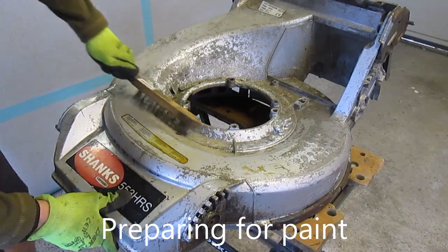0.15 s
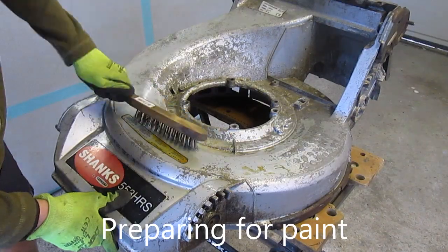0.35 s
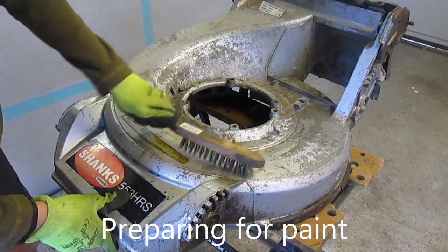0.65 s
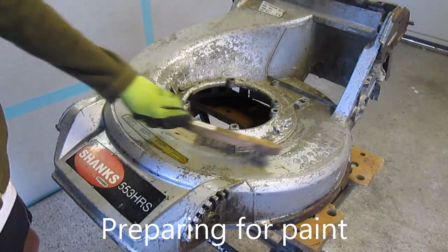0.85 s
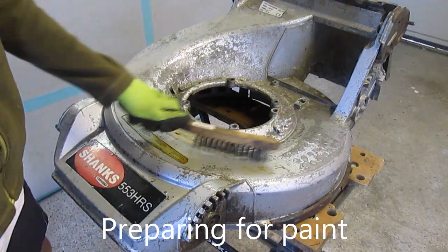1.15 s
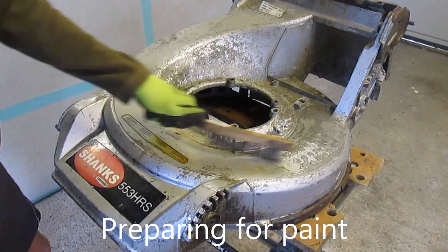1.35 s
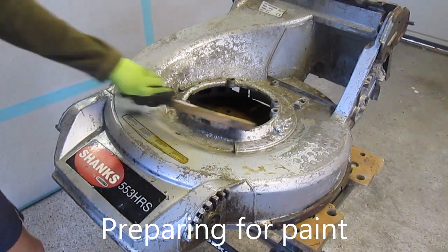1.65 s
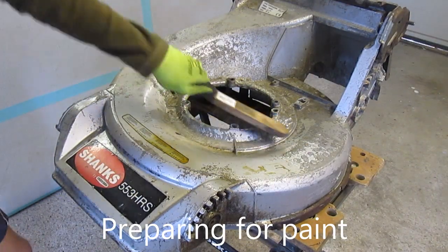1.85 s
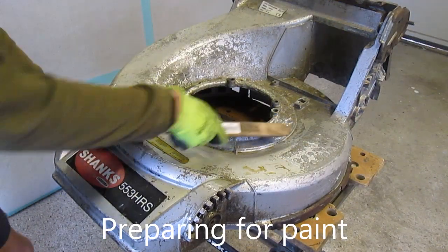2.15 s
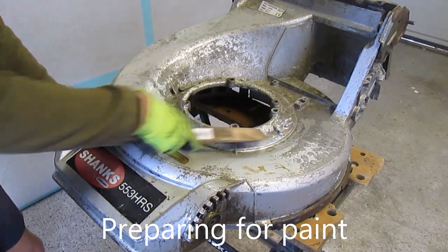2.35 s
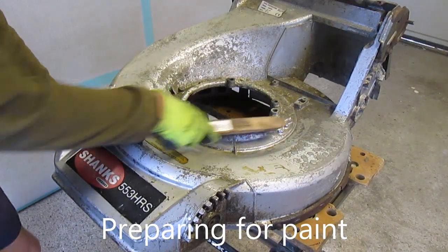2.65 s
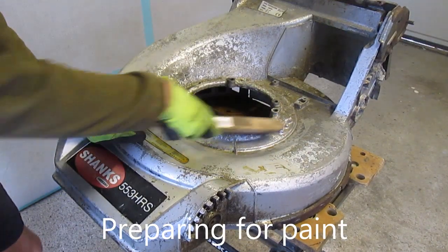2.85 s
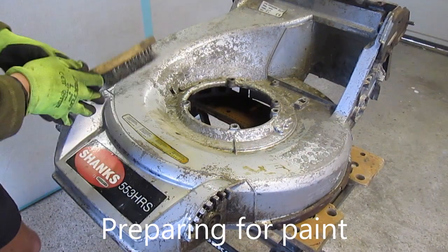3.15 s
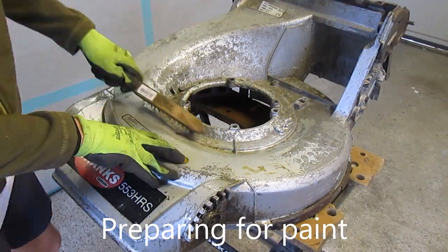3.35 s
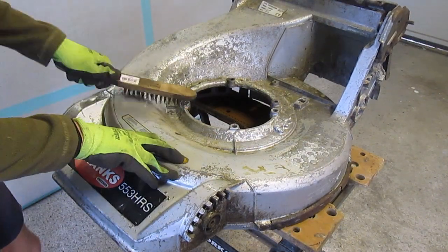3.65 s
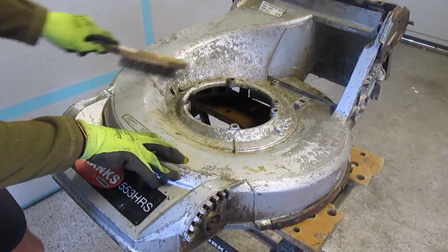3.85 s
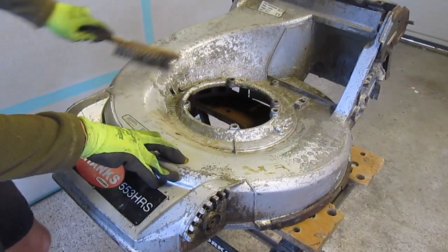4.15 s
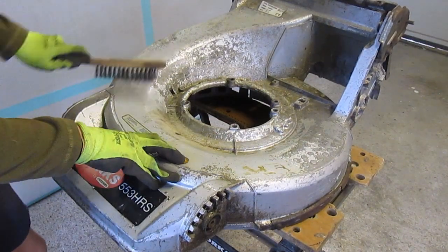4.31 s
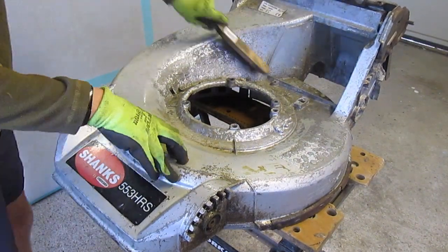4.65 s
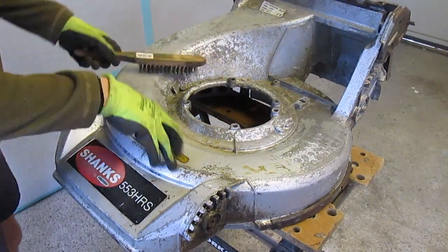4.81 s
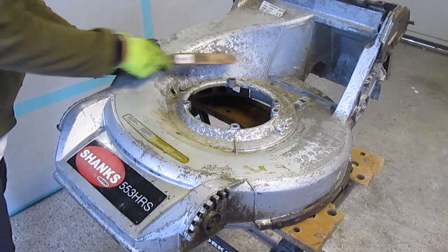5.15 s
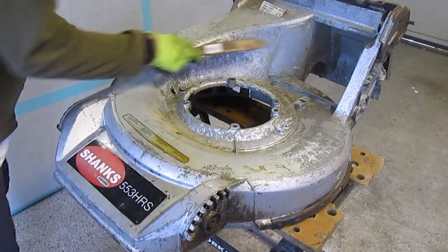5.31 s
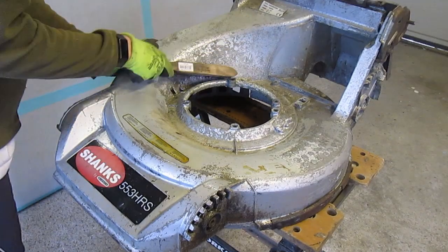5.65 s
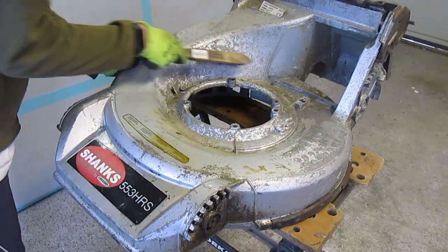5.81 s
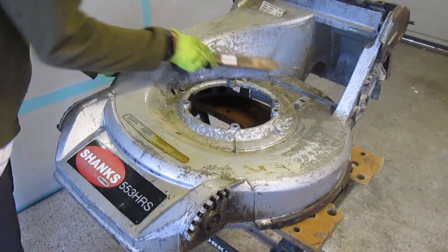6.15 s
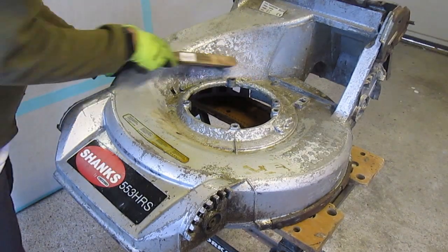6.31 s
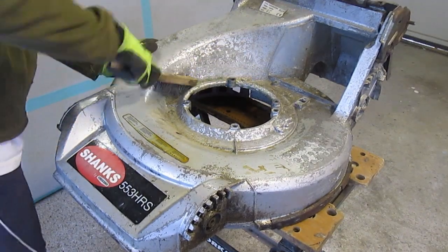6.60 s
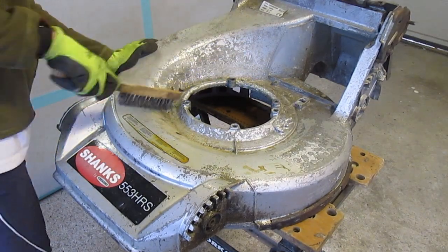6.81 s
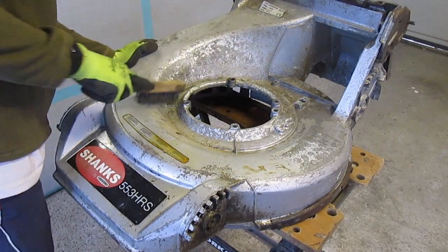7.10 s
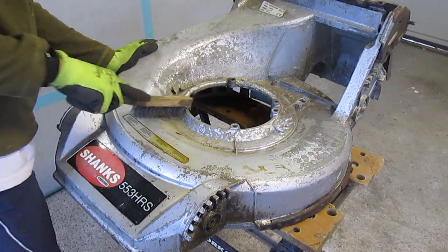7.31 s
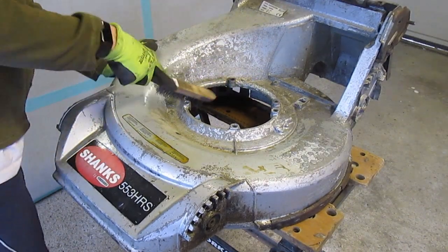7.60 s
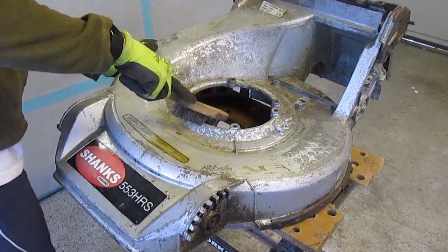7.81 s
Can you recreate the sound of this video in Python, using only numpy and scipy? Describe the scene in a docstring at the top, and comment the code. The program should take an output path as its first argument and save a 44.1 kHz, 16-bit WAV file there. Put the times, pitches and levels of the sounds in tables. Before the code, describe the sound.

Rapid gritty scratching of steel bristles on a metal housing, faintly ringing, broken by short pauses and occasional woody taps in a workshop.

```python
"""Wire brush on a metal shell

A wire brush scrubs a cast metal shell in a workshop, in quick short strokes with a few pauses.
Random ticks are the steel bristles on rough paint; they are heard bare and also ring the shell's modes.
The wooden back of the brush knocks now and then: a short hollow thump with a noisy rattle.
Coloured noise makes a low rumble, a faint hiss and a murmur that swells in the pauses.
Left and right share one sound, but the phase between them drifts in patches."""
import sys
import numpy as np
from scipy import signal
from scipy.fft import rfft, irfft, next_fast_len
from scipy.io import wavfile
from scipy.ndimage import uniform_filter1d

SR = 44100
rng = np.random.default_rng(int(sys.argv[2]) if len(sys.argv) > 2 else 0)


def transcribe(u):
    """Save the signal u as a 16-bit wav file named by the first command-line argument.

    u: samples, shape (n,) or (channels, n), limited to [-1, 1]; the rate is SR.
    q: integer samples, one column per channel.
    """
    v = np.clip(np.atleast_2d(u).T, -1, 1)
    q = np.round(v * 32767).astype(np.int16)
    wavfile.write(sys.argv[1], SR, q)


N = 351477  # length in samples, about 8 s

# All levels in the tables are relative: the layers are balanced against each other when mixed.
# The room's noise spectrum. Each row: frequency in Hz, strength in dB.
ROOM_SPECTRUM = [(15, 5.5), (25, 2), (42, -1.5), (70, -24.5), (150, -71), (400, -29), (1500, -27),
                 (3000, -40), (6000, -42), (9000, -54)]
# Knocks of the brush back. Each row: time in seconds, thump level in dB, pitch in Hz,
# hardness (rattle against thump) in dB.
KNOCKS = [(0.089, -41, 562, 8), (0.757, -43, 402, -11), (1.032, -36, 746, 8), (1.102, -30.5, 425, 5),
          (1.191, -44, 423, 21), (1.467, -47, 417, 19), (1.645, -40, 440, 6), (1.706, -56, 490, 12),
          (1.823, -47.5, 700, 19), (2.703, -38.5, 420, -19), (3.267, -33.5, 508, 5),
          (3.316, -35.5, 593, -15), (3.386, -44.5, 618, 16), (3.453, -36.5, 507, -24),
          (3.528, -43, 410, 15), (3.649, -36.5, 401, 11.5), (3.834, -47, 790, 23.5), (3.88, -32, 490, -17),
          (3.958, -39, 400, 16.5), (4.765, -30, 755, -8), (4.915, -55.5, 800, 32.5), (5.04, -39, 419, 0),
          (5.242, -40, 776, 15), (5.424, -40, 420, 3), (6.49, -37, 402, -27), (6.575, -35, 750, 13),
          (6.798, -35.5, 402, 12), (6.855, -37.5, 757, 2), (7.512, -26.5, 410, 6.5)]
# Ringing modes of the shell. Each row: frequency in Hz, width in Hz, level in dB.
SHELL_MODES = [(411, 30, -5), (520, 50, -13), (735, 60, -13), (1184, 45, -13), (1370, 35, -11),
               (1476, 18, -4), (1666, 28, -10), (1998, 45, -3.5), (2196, 38, -5), (2530, 60, -11),
               (2885, 50, -8), (2996, 14, -2), (3450, 36, 0), (3938, 45, -4), (4263, 55, -4), (4706, 55, 1),
               (4870, 45, -2), (5000, 50, .5), (5165, 70, -4), (5717, 60, -3), (5970, 70, -6),
               (6190, 80, -10), (6567, 90, -12), (7482, 90, -17)]
# How strongly three groups of shell modes ring at each spot. Each row: time in seconds,
# level near 1.5 kHz in dB, level near 2 kHz in dB, level near 3.2 kHz in dB.
SPOT_RINGING = [(0, -7.5, -12, -5.5), (.5, 6, 8, -4), (1, -12, 3.5, 4), (1.5, -10, -5, 1.5),
                (2, 1, 4.5, 0.5), (2.5, 9.5, 7, 5.5), (3, 11.5, 3, 3), (3.5, -7, 2, 3.5),
                (4, 2, -1.5, -7.5), (4.5, 4.5, 11, 3.5), (5, 1.5, 2, 0), (5.5, -4, -7, -1.5),
                (6, 6, 5, -0.5), (6.5, 3, 7, 4), (7, -1, 0, 0), (7.5, 0.5, 9, -1.5), (8, -3, -2.5, 11)]
# Bare scratch of the bristles. Each row: frequency in Hz, strength in dB.
SCRATCH_SPECTRUM = [(100, -34), (300, -24), (600, -19), (1000, -16), (1500, -16), (2300, -8), (3500, -3),
                    (5000, -1), (6200, -7), (8000, -18), (10000, -29), (12000, -43), (16000, -54)]
# The scrub as the brush moves from spot to spot. Each row: time in seconds, level in dB,
# low ring of the shell in dB, its hollow boom in dB, bristle tips in dB.
SCRUB = [(0, -24.5, 5.5, -6.5, 0), (.5, -25, -5.5, 1, -5), (1, -28.5, 2.5, -1.5, -5),
         (1.5, -26.5, 1, -4.5, -2), (2, -27.5, -3.5, 3, 6.5), (2.5, -27, -3.5, 6, 2), (3, -26, -5, 4, 5.5),
         (3.5, -27.5, 2.5, -2, 4.5), (4, -25.5, 1, 0.5, -6), (4.5, -26, -5.5, -4.5, 3.5),
         (5, -27, 4.5, -10.5, 5), (5.5, -25, 0, -10, -1), (6, -25.5, -0.5, -14, 0.5),
         (6.5, -29.5, 1.5, 1, 6.5), (7, -26, 2, -7, 5), (7.5, -26, -3, -5.5, 2.5), (7.9, -32, 10, -3, 5.5)]
# The brush slows as the hand turns back. Each row: time in seconds, change of level in dB.
HAND_TURNS = [(0.03, -3.5), (0.08, -5.0), (0.144, -7.5), (0.194, -5.0), (0.255, -5.0), (0.331, -4.0),
              (0.375, -3.5), (0.401, -3.0), (0.465, -10.5), (0.527, -4.5), (0.569, -4.0), (0.621, -10.0),
              (0.678, -5.5), (0.704, -4.0), (0.83, -11.5), (0.89, -5.0), (0.914, -5.0), (0.956, -6.0),
              (1.05, -3.5), (1.094, -4.0), (1.131, -6.5), (1.177, -3.5), (1.257, -11.5), (1.331, -4.5),
              (1.365, -3.5), (1.511, -5.5), (1.576, -7.5), (1.648, -3.5), (1.682, -6.5), (1.752, -8.0),
              (1.794, -4.0), (1.838, -4.5), (1.864, -6.0), (1.898, -7.5), (2.071, -16.0), (2.131, -8.0),
              (2.179, -4.5), (2.205, -5.0), (2.231, -4.5), (2.287, -4.5), (2.419, -3.5), (2.444, -3.5),
              (2.502, -3.0), (2.548, -6.0), (2.686, -7.5), (2.74, -5.0), (2.772, -4.0), (2.804, -8.5),
              (2.887, -4.5), (2.951, -5.0), (2.987, -9.5), (3.52, -3.5), (3.66, -14.5), (3.947, -6.5),
              (3.995, -4.0), (4.013, -7.5), (4.059, -5.0), (4.111, -3.5), (4.182, -5.5), (4.252, -11.5),
              (4.326, -7.5), (4.384, -5.0), (4.45, -3.5), (4.51, -6.0), (4.582, -10.5), (4.713, -4.0),
              (4.777, -9.0), (5.013, -4.5), (5.092, -6.5), (5.206, -3.5), (5.238, -3.0), (5.268, -5.0),
              (5.322, -5.0), (5.354, -4.5), (5.406, -13.0), (5.509, -4.5), (5.575, -6.0), (5.611, -4.5),
              (5.699, -4.5), (5.813, -4.0), (5.847, -5.0), (5.966, -6.5), (6.048, -6.5), (6.104, -4.0),
              (6.148, -4.0), (6.298, -3.0), (6.36, -3.5), (6.447, -7.0), (6.521, -10.0), (6.563, -5.0),
              (6.603, -3.5), (6.643, -6.0), (6.667, -9.0), (6.743, -4.0), (6.793, -6.0), (6.82, -8.5),
              (6.87, -4.0), (6.92, -7.0), (6.968, -7.0), (7.142, -7.5), (7.202, -5.0), (7.23, -4.5),
              (7.323, -4.0), (7.449, -5.0), (7.483, -7.0), (7.611, -5.5), (7.673, -6.5), (7.742, -5.0),
              (7.792, -9.0), (7.874, -10.0)]
# The brush eases off the shell. Each row: start in seconds, end in seconds, depth of the dip in dB.
LIFTS = [(3.004, 3.185, 23.5), (3.14, 3.319, 12), (3.311, 3.405, 23.5), (3.692, 3.886, 14),
         (3.718, 3.87, 29.5), (4.811, 4.968, 7.5), (5.444, 5.485, 13.5), (6.97, 7.105, 13.5),
         (7.349, 7.425, 15), (7.889, 8.1, 18)]
# Short firm touches of the bristles. Each row: time in seconds, peak level in dB.
TOUCHES = [(.84, -26), (0.924, -30.5), (2.754, -23), (2.96, -40), (3.075, -36.5), (3.102, -30.5),
           (3.317, -27), (3.331, -33), (3.359, -31.5), (3.838, -26), (3.862, -43), (7.018, -26),
           (7.079, -31), (7.396, -31.5), (7.426, -39)]
# Phase by which the left leads in the bass, held until the next row.
# Each row: start in seconds, lead in radians.
BASS_LEAD = [(0, -.7), (.41, -2), (.85, -.1), (1.69, 2.1), (2.14, 3.14), (2.46, .7), (2.75, 2), (2.9, .5),
             (3.12, -1.4), (3.5, 2.8), (3.72, -1.4), (4.05, .2), (4.71, 3.14), (4.9, -1.5), (5.14, .1),
             (6.02, -2.2), (6.13, -.5), (6.17, 3.14), (6.22, -1), (6.29, 3.14), (6.36, .6), (6.93, 2.7),
             (7.13, -.2), (7.33, 2.2), (7.63, -.2)]
# Sliding bands where left and right pull far apart. Each row: start in seconds, first centre in Hz,
# end in seconds, last centre in Hz, basic width in Hz, basic lead in radians.
APART_BANDS = [(.55, 3900, 1.1, 3600, 500, 2.3), (.95, 3300, 2.4, 2900, 900, 2.3),
               (1.05, 2000, 1.65, 1400, 800, -2.3), (2.07, 5500, 3.05, 4100, 800, -2.4),
               (2.3, 5700, 3, 5300, 350, 2.3), (3.4, 4900, 3.95, 4300, 900, 2),
               (3.9, 4200, 4.9, 3600, 900, 2.3), (4, 3000, 5.48, 2700, 1000, 2.1),
               (4.2, 2300, 5.3, 1500, 700, -2.2), (4, 6400, 5.1, 5300, 500, 2.2),
               (5.5, 4300, 6.9, 3900, 700, -1.4), (6.7, 2300, 7.5, 1900, 600, 2.6),
               (6.9, 1500, 7.52, 1000, 800, 2.3), (7.6, 3600, 8, 3200, 1100, 2),
               (.85, 6900, 1.3, 6400, 700, 2.4), (0, 6500, .3, 6400, 600, 2.7),
               (0, 3100, .5, 2900, 350, 2.6), (3.25, 1500, 3.72, 500, 700, 2.7),
               (2.08, 2000, 3.05, 1950, 300, 2.8), (6.05, 900, 6.4, 800, 1100, 2.8),
               (6.65, 3600, 7.2, 3200, 350, 2.7), (6.5, 5700, 7.65, 4500, 500, 2.7),
               (7.6, 4400, 8, 4200, 600, 2.6), (0, 3100, .2, 3250, 400, 3.14),
               (.27, 2650, .65, 2600, 350, 3.14), (.48, 6800, .62, 6800, 300, 3.14),
               (.83, 5400, 1.4, 4750, 450, 3.14), (1.92, 2500, 2.07, 2400, 400, 3.14),
               (2.92, 3500, 3.06, 3400, 450, 3.14), (3.17, 2050, 3.36, 2600, 500, 3.14),
               (3.75, 1200, 3.92, 600, 450, 2.9), (4.42, 1900, 4.88, 1750, 550, 3.14),
               (4.67, 1300, 4.84, 500, 600, 3.14), (4.48, 3550, 4.75, 3400, 250, 3.14),
               (5.3, 5150, 5.48, 4950, 450, 3.14), (5.62, 5450, 6.1, 4750, 450, 3.14),
               (5.98, 4850, 6.3, 4450, 600, 3.14), (5.77, 6600, 5.97, 6950, 350, 3.14),
               (6.42, 4650, 6.6, 4350, 650, 3.14), (6.58, 4950, 6.88, 5300, 1150, 3.14),
               (6.86, 5350, 7.35, 5150, 600, 3.14), (7.1, 3100, 7.3, 2850, 400, 3.14),
               (6.22, 1350, 6.55, 1500, 450, 3), (7.61, 5000, 7.82, 4600, 650, 3.14),
               (7.62, 1700, 7.84, 1350, 250, 3.14)]

ROOM_DB = -43.5
# the murmur: level before swelling, dB gained per dB the scrub loses, limit of that gain, smoothing time
MURMUR_DB, MURMUR_RISE, MURMUR_TOP_DB, MURMUR_S = -73.5, 4.8, 23.5, 0.08
TURN_S = .012  # time either side of a turn at which its dip has shrunk to about a third
WOBBLE_DB, WOBBLE_PER_S = .8, 70
EASE_S, LAND_S = 0.024, 0.0037  # time to fade away at a lift and to land again
TOUCH_RISE_S, TOUCH_FADE_S = 0.0017, 0.0084
TOP_HZ = 15850  # the recorder's upper limit


def undb(db):
    """Turn decibels into a plain gain."""
    return 10 ** (np.asarray(db) / 20)


def level(x, db):
    """Scale a sound to the given average (RMS) level in dB."""
    return x * undb(db) / np.sqrt(np.mean(x ** 2))


def curve(s, values):
    """Draw straight lines through values placed at times in seconds."""
    return np.interp(np.arange(N) / SR, s, values)


def held(table, s):
    """The value of the last row reached at each time."""
    start, value = np.transpose(table)
    return value[np.searchsorted(start, s, "right") - 1]


def colour(x, points):
    """Shape the spectrum by (Hz, dB) points."""
    size = next_fast_len(len(x))
    log_hz = np.log(np.fft.rfftfreq(size, 1 / SR) + 1)
    points = np.array(points)
    gain = undb(np.interp(log_hz, np.log(points[:, 0]), points[:, 1]))
    return irfft(rfft(x, size) * gain, size)[:len(x)]


def butter(x, order, hz, kind="low"):
    """Keep what lies below hz, or above it for kind "high"."""
    return signal.sosfilt(signal.butter(order, hz, kind, fs=SR, output="sos"), x)


def ring(x, hz, width):
    """One resonance, gain 1 at its centre."""
    return signal.lfilter(*signal.iirpeak(hz, hz / width, SR), x)


def walk(rate):
    """Random levels held 1 / rate seconds and smoothed twice; spread near 1."""
    hold = int(SR / rate)
    steps = np.repeat(rng.standard_normal(N // hold + 1), hold)
    return 1.3 * uniform_filter1d(uniform_filter1d(steps, hold), hold)[:N]


def eased():
    """How many dB the scrub has lost to the lifts: it fades away and lands again sharply."""
    t = np.arange(N) / SR
    dips = []
    for start, end, dip_db in LIFTS:
        lifted = np.minimum((t - start) / EASE_S, (end - t) / LAND_S)
        dips.append(dip_db * np.clip(lifted, 0, 1))
    return np.max(dips, axis=0)


def room():
    """Rumble and hiss that waver a little, and a murmur that swells where the brush eases off."""
    steady = level(colour(rng.standard_normal(N), ROOM_SPECTRUM), ROOM_DB) * undb(0.37 * walk(2.5))
    murmur = colour(rng.standard_normal(N), [(55, -20), (90, 1.5), (250, 4.5), (500, -8),
                                             (1600, -7), (3000, -8), (7000, -40)])
    rise_db = MURMUR_RISE * uniform_filter1d(eased(), int(MURMUR_S * SR))
    swell_db = np.minimum(rise_db, MURMUR_TOP_DB) + 1.9 * walk(16.0)
    return steady + level(murmur, MURMUR_DB) * undb(swell_db)


def knocks():
    """A hollow, rough thump at its own pitch and a hard rattle for each knock."""
    thump, rattle = np.zeros(N), np.zeros(N)
    t = np.arange(2048) / SR
    # each knock swells for 10 ms, then dies away
    shape = (t / 0.0095) ** 2 * np.exp(2 - 2 * t / 0.01)
    grits = rng.standard_normal((len(KNOCKS), len(t)))
    for (s, db, hz, hard_db), grit in zip(KNOCKS, grits):
        at = int(s * SR) - 128  # the swell starts about 3 ms ahead of the listed time
        hollow = np.sin(2 * np.pi * hz * t) + level(ring(grit, hz, 300), -8)
        thump[at:at + len(t)] += undb(db) * shape * hollow
        rattle[at:at + len(t)] += undb(db + hard_db) * shape * grit
    rattle = colour(rattle, [(400, -33), (800, -5.0), (1500, -3.5), (2300, -5.5), (4000, -17.0), (8000, -67)])
    return thump, rattle


def touches():
    """Power of the touches: a quick rise, a short fade."""
    t = np.arange(N) / SR
    power = np.zeros(N)
    for s, db in TOUCHES:
        rise = np.clip((t - s) / TOUCH_RISE_S, 0, 1)
        fade = np.exp(-(np.maximum(t - s, 0) / TOUCH_FADE_S) ** 2)
        power += undb(2 * db) * rise * fade
    return power


def pressure():
    """The scrub wobbles, dips at each turn of the hand and drops at lifts; touches add their power."""
    t = np.arange(N) / SR
    s, scrub_db = np.transpose(SCRUB)[:2]
    db = curve(s, scrub_db) + WOBBLE_DB * walk(WOBBLE_PER_S)
    for s, change_db in HAND_TURNS:
        at = slice(max(int((s - 3 * TURN_S) * SR), 0), int((s + 3 * TURN_S) * SR))
        db[at] += change_db * np.exp(-((t[at] - s) / TURN_S) ** 2)
    # doubling the dB turns amplitude into power
    return np.sqrt(undb(2 * (db - eased())) + touches())


def bristles(per_s, spread_db, chatter_s):
    """Each wire catches and lets go: dense ticks of uneven size that chatter on for a moment."""
    size = next_fast_len(N)
    caught = rng.random(N) < per_s / SR
    ticks = caught * rng.standard_normal(N)
    ticks = ticks * undb(spread_db * np.minimum(rng.exponential(size=N), 4))
    # the chatter holds each narrow band of a tick back by its own short time
    lag_s = chatter_s * np.repeat(rng.exponential(size=256), size // 500)[:size // 2 + 1]
    phase = 2 * np.pi * np.cumsum(lag_s) * SR / size
    return level(irfft(rfft(ticks, size) * np.exp(-1j * phase), size)[:N], 0)


def bare_scratch(heard, low, boom, tips, jolts):
    """The ticks heard through the air: low part, bristle tips and hollow boom change with the spot."""
    scratch = colour(heard, SCRATCH_SPECTRUM)
    body = butter(scratch, 2, 2200)
    edge = butter(scratch, 2, 7200, "high")
    # the middle of the scratch follows the spot and flickers apart from the rest
    spot = np.transpose(SPOT_RINGING)
    middle = undb(0.76 * curve(spot[0], spot[-1]) + 0.72 * walk(30))
    scratch = scratch + (middle - 1) * ring(scratch, 2950, 1200)
    hollow = (boom - 1) * low * ring(scratch, 440, 430)
    return scratch + (low * jolts ** .5 - 1) * body + (tips - 1) * edge + hollow


def shell(ticks, rattle, low, boom, jolts):
    """Ticks and rattle ring the metal's modes, which come and go as the brush moves over it."""
    spot_s, *groups_db = np.transpose(SPOT_RINGING)
    groups_hz = [(1400, 1550), (1900, 2300), (2800, 3600)]
    ringing = 0
    for k, (hz, width, db) in enumerate(SHELL_MODES):
        drive = ticks * undb(3.4 * walk(28))
        for (lo_hz, hi_hz), group_db in zip(groups_hz, groups_db):
            if lo_hz < hz < hi_hz:
                drive = drive * undb(curve(spot_s, group_db))
        if hz < 2300:
            drive = drive * low
        if hz < 1000:
            drive = drive * jolts
        if hz < 600:
            drive = drive * boom
        # neighbouring modes swing in opposite directions
        ringing = ringing + (-1) ** k * undb(db) * ring(drive + rattle, hz, width)
    # the shell's ringing is kept below about 8 kHz
    return butter(ringing, 4, 8000)


def brush():
    """The ticks are heard bare and through the shell; the knocks thump and rattle along."""
    s, _, low_db, boom_db, tips_db = np.transpose(SCRUB)
    # some wires are heard through the air, others mostly drive the metal
    wires = [bristles(per_s=5000, spread_db=2.4, chatter_s=.0015) for _ in range(2)]
    heard, ticks = np.array(wires) * pressure()
    low, boom = undb(curve(s, low_db)), undb(curve(s, boom_db))
    tips = undb(curve(s, tips_db) + 1.8 * walk(25))
    # the hand jolts the shell unevenly, which its lowest modes feel most
    jolts = undb(2.85 * walk(18))
    bare = bare_scratch(heard, low, boom, tips, jolts)
    thump, rattle = knocks()
    scrub = bare + undb(3.5) * shell(ticks, rattle, low, boom, jolts)
    return undb(7.5) * scrub + undb(-0.5) * thump + undb(3.5) * rattle


def taper(s, start, end):
    """A band opens and closes like a lens: widest in its middle."""
    from_middle = 2 * (s - start) / (end - start) - 1
    return 1.2 * np.sqrt(np.clip(1 - from_middle ** 2, .1, 1))


def spread(x, bass_hz, treble_hz, patch_hz, patch_s, treble_s, ragged_hz, fray_s):
    """Both ears get the same sound; the phase between them holds in patches and jumps at their edges."""
    hz, s, frames = signal.stft(x, SR, nperseg=1024, noverlap=768)
    # smooth a random field over frequency and time to make the patches
    re, im = rng.standard_normal((2, *frames.shape))
    field = re + 1j * im
    for _ in range(2):
        field = uniform_filter1d(field, int(patch_hz / hz[1]), axis=0)
    quick, slow = field[-1], field
    for _ in range(2):
        slow = uniform_filter1d(slow, int(patch_s / s[1]), axis=1)
        quick = uniform_filter1d(quick, int(treble_s / s[1]))
    # the patches sink in pitch by 400 Hz each second
    rows = (np.arange(len(hz))[:, None] + (400 * s / hz[1]).astype(int)) % len(hz)
    slow = np.take_along_axis(slow, rows, axis=0)
    lead = np.round(np.angle(slow) * .62)  # whole radians
    lead[hz > treble_hz] = .88 * np.angle(quick)
    # the edges of the wide patches are ragged
    fray = uniform_filter1d(field.imag, int(fray_s / s[1]), axis=1)
    fray = fray / fray.std()
    # here and there a small island inside a patch slips a little out of step
    islands = uniform_filter1d(field.real, int(fray_s / s[1]), axis=1)
    slip = .4 * (islands > 1.05 * field.real.std() / 2)
    place = hz[:, None] + ragged_hz * (slow.real / slow.real.std() / 2 + fray / 2)
    bass_lead = held(BASS_LEAD, s) - slip * (hz[:, None] > 250)
    lead = np.where(place < bass_hz, bass_lead, lead)
    place = hz[:, None] + ragged_hz / 4 * fray
    for start, from_hz, end, to_hz, width, radians in APART_BANDS:
        centre_hz = np.interp(s, [start, end], [from_hz, to_hz])
        inside = abs(place - centre_hz) < width / 2 * taper(s, start, end)
        band_lead = radians + np.round(.33 * fray) * np.sin(radians) / 2 - slip
        lead = np.where(inside & (s >= start) & (s < end), band_lead, lead)
    # the left turns forward by half the lead, the right back by the other half
    sides = np.array([1, -1])[:, None, None]
    ears = signal.istft(frames * np.exp(.5j * lead * sides), SR, nperseg=1024, noverlap=768)[1]
    return ears[:, :N] * np.std(x) / np.std(ears)


def scene():
    """Brush and room together, spread between left and right."""
    return spread(brush() + room(), bass_hz=650, treble_hz=7200, patch_hz=250, patch_s=.3,
                  treble_s=.055, ragged_hz=230, fray_s=.04)


def record(dry):
    """Each microphone adds its own faint high hiss; the recorder cuts the top."""
    noise = rng.standard_normal(dry.shape)
    hiss = undb(-69) * np.array([colour(x, [(2000, -32), (8000, -1.5)]) for x in noise])
    return signal.sosfilt(signal.ellip(10, .2, 70, TOP_HZ, fs=SR, output="sos"), dry + hiss)


dry = scene()
out = record(dry)
transcribe(out)
```